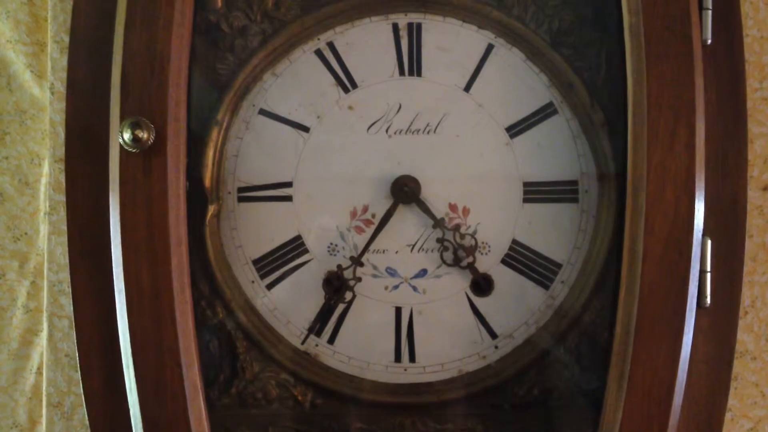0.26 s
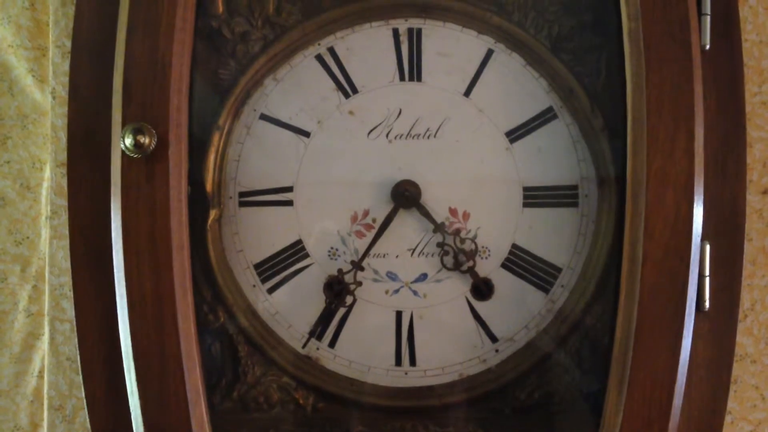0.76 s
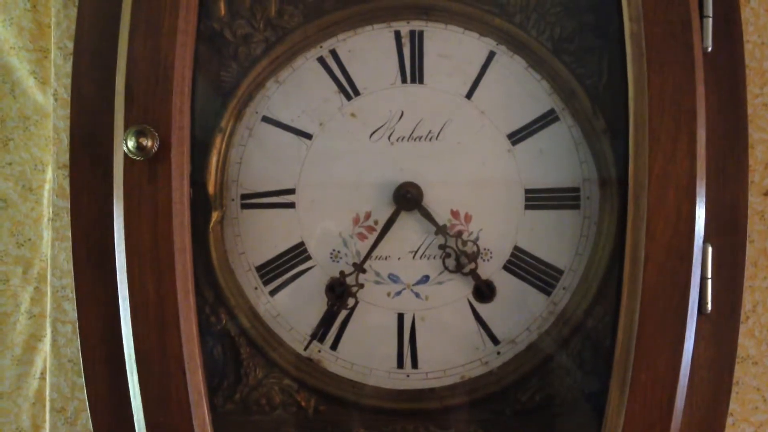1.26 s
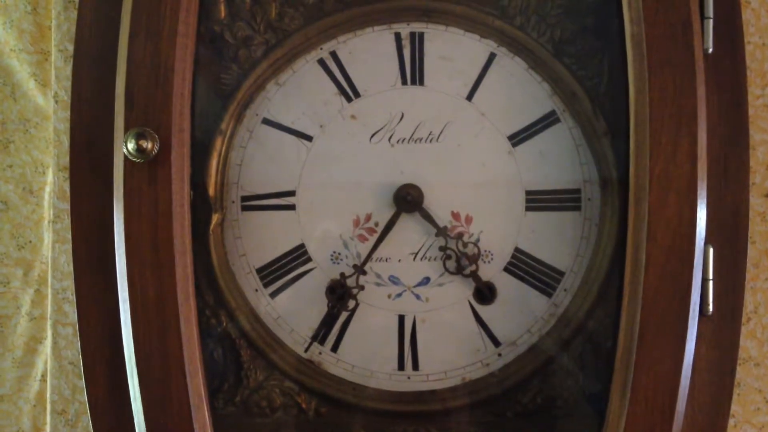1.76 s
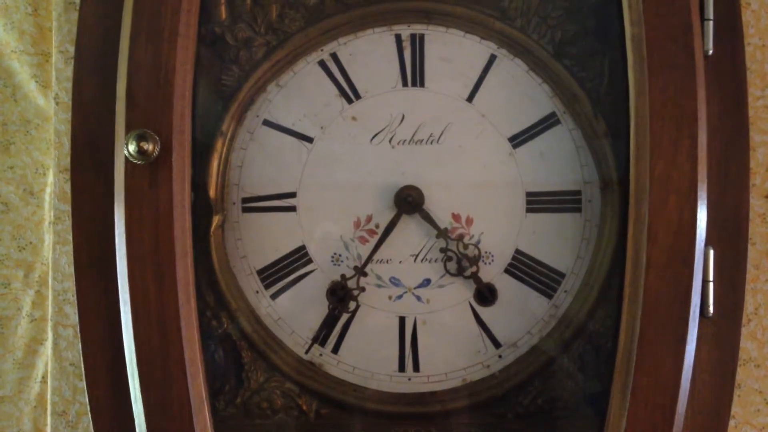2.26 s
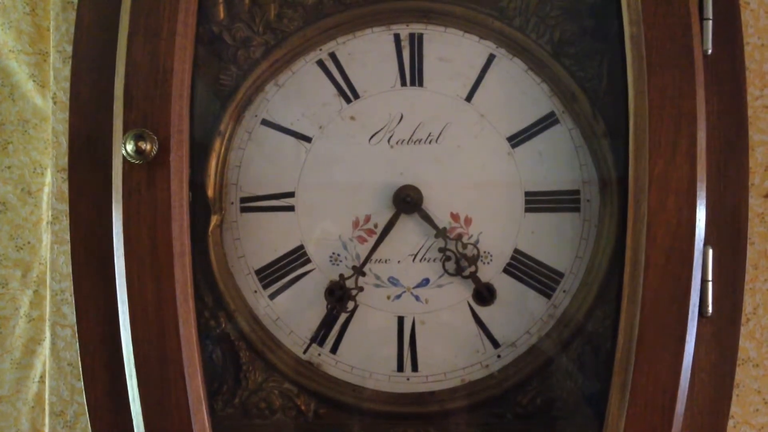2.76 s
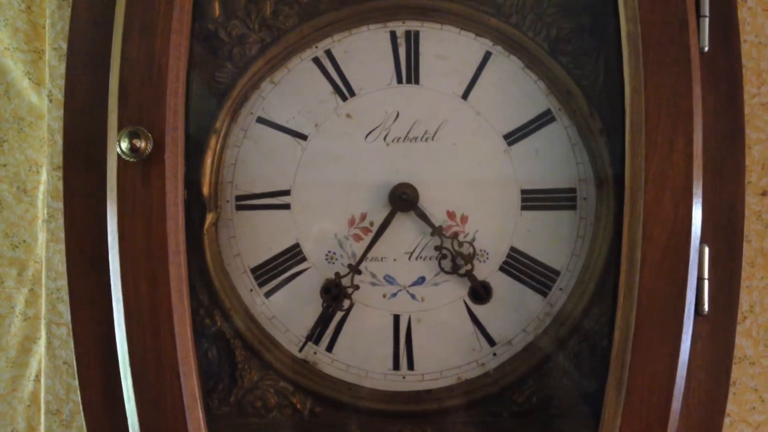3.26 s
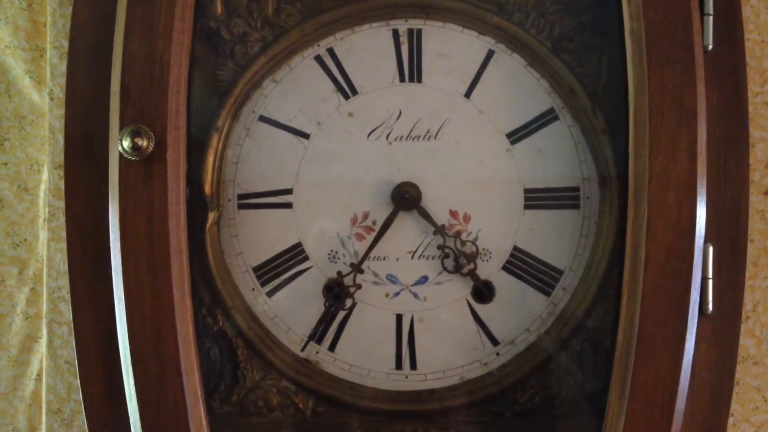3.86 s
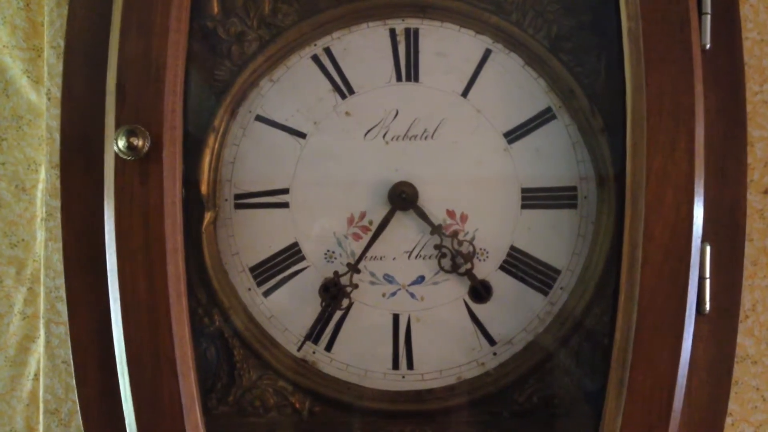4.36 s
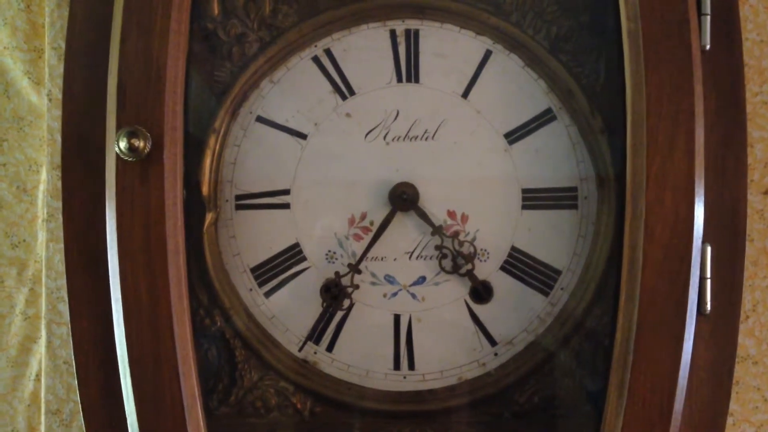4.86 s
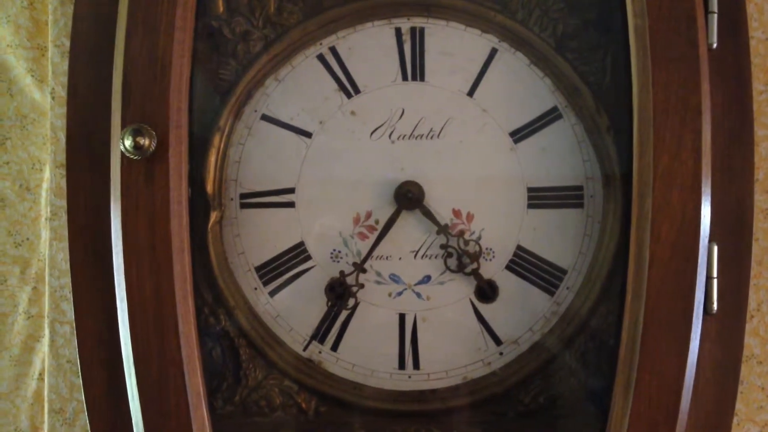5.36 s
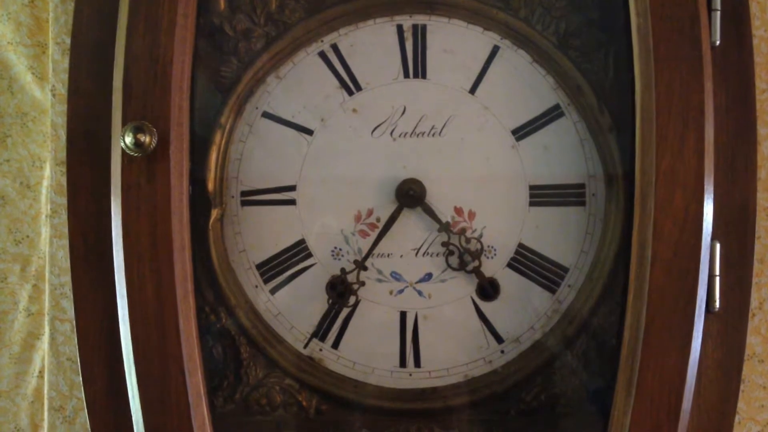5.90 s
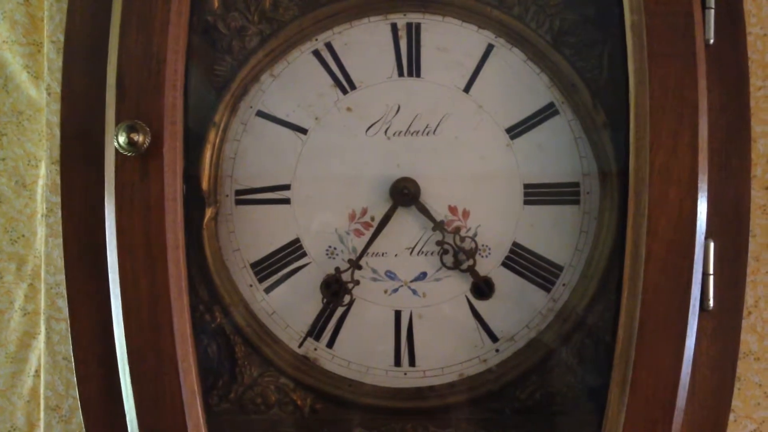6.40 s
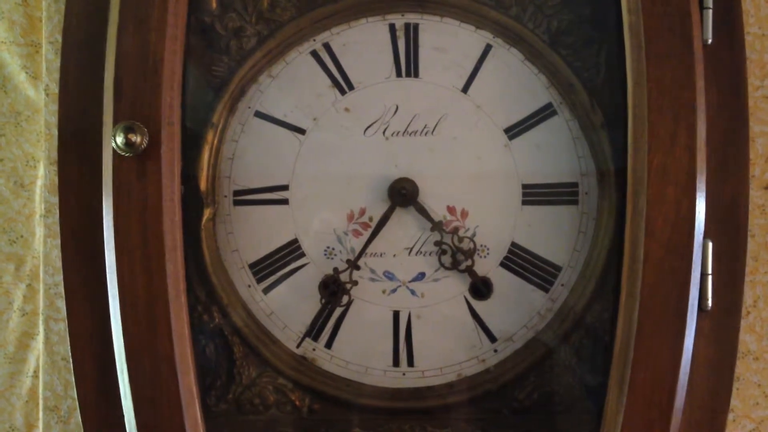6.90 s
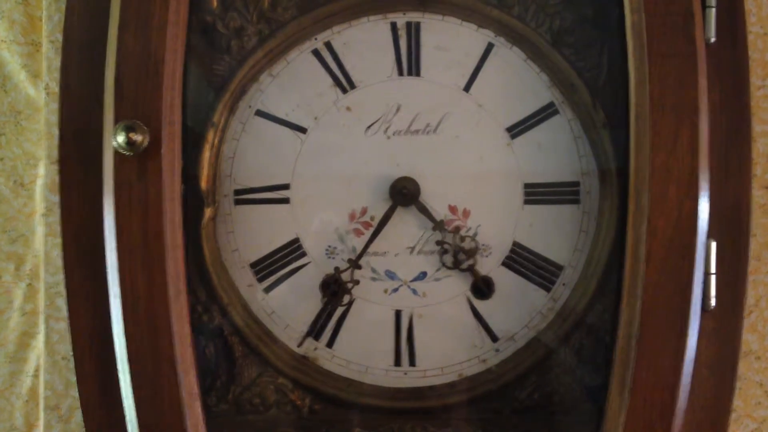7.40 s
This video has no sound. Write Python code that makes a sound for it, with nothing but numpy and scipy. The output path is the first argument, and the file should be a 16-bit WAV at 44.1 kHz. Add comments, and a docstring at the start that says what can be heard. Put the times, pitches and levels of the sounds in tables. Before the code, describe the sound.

Slow, steady ticking from an old tall clock, close to the microphone. Every beat clatters as several tiny metal contacts within a fraction of a second, crisp and gritty on top, hollow and wooden below, sometimes leaving a thin steely ring. Alternate beats change timbre. Between them the quiet room holds only faint muffled knocks, low rumble and light microphone hiss.

```python
"""Bright, rattling ticks, each with a wooden boom after it: a tall pendulum clock in a quiet room.
It is heard from close by, through its door. Each beat is a cluster of contacts in the escapement that sets
brass movement, wooden case and a thin rod ringing as decaying sines, with gritty noise for the dense modes.
Left and right swings strike different pallets. Faint thuds, a low rumble and microphone hiss lie below."""
import sys
import numpy as np
from scipy import signal
from scipy.fft import rfft, irfft, next_fast_len
from scipy.io import wavfile

SR = 44100
rng = np.random.default_rng(int(sys.argv[2]) if len(sys.argv) > 2 else 0)


def voltage_ratio(level):
    """Linear amplitude factor for a level in decibels (scalar or array-like)."""
    return 10 ** (np.asarray(level, float) / 20)


def materialize(psi):
    """Save the field psi as 16-bit PCM at rate SR to the path in sys.argv[1].

    A 1-D psi becomes a single channel; in a 2-D psi each row is a channel.
    """
    bounded = np.clip(np.atleast_2d(psi).T, -1, 1)
    quanta = np.round(bounded * 32767).astype(np.int16)
    wavfile.write(sys.argv[1], SR, quanta)


N = 336924   # samples

# upper limits: large boards, small panels, brass plates
PANEL_HZ, BRASS_HZ, PLATE_HZ = 760, 2800, 5500

# beats: landing_s, landing_db, rebound_s (time after landing), rebound_db, loss_db (per later bounce)
BEATS = [(0.336, -19, 0.014, -18.5, 10.5), (1.3737, -19, 0.013, -19, 7.5), (2.5023, -17, 0.016, -17.5, 13),
         (3.5106, -23.5, 0.02, -12, 30), (4.6119, -18.5, .0126, -17.5, 6.5), (5.6454, -22, 0.019, -14, 13),
         (6.7981, -18, .012, -19, 8)]
# shock into the case at each of the five contacts, clack of the small panels and push into the large boards:
# clack_left_db, clack_right_db, push_left_db, push_right_db
SHOCKS = [(-30.5, -36, -30.5, -41.5), (-32, -39, -29, -39), (-42.5, -51.5, -33.5, -37.5),
          (-47.5, -51.5, -44.5, -46), (-57.5, -77, -47, -44)]
# plucks of the thin rod: start_s, level_db
PLUCKS = [(0.336, -54), (0.377, -51), (1.4011, -49.5), (1.4283, -56.5), (2.5023, -47), (2.5442, -55),
          (3.532, -52), (4.6114, -46), (4.6555, -52), (5.6688, -48), (5.6898, -49), (6.8444, -43),
          (6.8693, -59)]
# stray light touches: start_s, blow_db
TOUCHES = [(0.4194, -45), (1.3684, -35), (1.4445, -53), (5.6515, -26), (6.8693, -40.5)]
TOUCH_CLACK_DB = -12   # clack of a touch, relative to its blow


def clock():
    """Beat by beat the contacts strike brass, wood and rod; the swing alternates left and right."""
    out = np.zeros(N + SR)
    size = int(.7 * SR)   # length of one beat's stretch
    for beat, row in enumerate(BEATS):
        side = beat % 2   # 0 left, 1 right
        times_s, blows_db = contacts(*row)
        start = round(times_s[0] * SR) - 400   # room for touches just before the landing
        clacks_db, pushes_db = np.array(SHOCKS)[:, side::2].T
        blows = impulses(np.c_[times_s, blows_db], start, size)
        clacks = impulses(np.c_[times_s, clacks_db], start, size)
        pushes = impulses(np.c_[times_s, pushes_db], start, size)
        touches = impulses(TOUCHES, start, size)
        plucks = impulses(PLUCKS, start, size)
        blows = blows + touches
        clacks = clacks + voltage_ratio(TOUCH_CLACK_DB) * touches

        brass = movement(blows, clacks, side, plate_db=17, chatter_db=-3, chatter_t60=0.069,
                         chatter_per_s=800., scatter_db=3.0, contact_s=0.0012)
        boards = case(clacks, pushes, side, lags_s=(.005, .0015), contact_hz=3480.0,
                      knock_db=-2.5, knock_t60=0.094, knocks_per_s=200.)
        dense = wash(blows, clacks, pushes, side, levels_db=(4.0, 1, 9.0, -6.5),
                     rises_hz=(41.0, 60., 400., 300.), grit=0.84)
        out[start:start + size] += voltage_ratio(-16.5) * brass + voltage_ratio(-8.5) * boards + dense + rod(plucks, side)
    return out[:N]


BOUNCE_S, BOUNCE_STRETCH = .0135, 1.2   # first gap after the rebound, growth of each next gap


def contacts(landing_s, landing_db, rebound_s, rebound_db, loss_db):
    """Times and blows of one beat: landing, rebound, then three bounces, each later and weaker."""
    later = np.arange(3)
    gaps_s = np.r_[0, rebound_s, BOUNCE_S * BOUNCE_STRETCH ** later]
    blows_db = np.r_[landing_db, rebound_db, rebound_db - loss_db * (later + 1)]
    return landing_s + np.cumsum(gaps_s), blows_db


# ringing modes of the brass movement, levels relative: pitch_hz, left_swing_db, right_swing_db, t60_s
MOVEMENT = [(3370, -19.5, -11, 0.054), (3586, -53, -11, 0.027), (4130, -23, -21.5, 0.081),
            (4295, -18.5, -29, 0.078), (4450, -16.5, -15.5, 0.053), (5370, -15, -7.5, 0.069),
            (6220, -10.5, -17, 0.057), (6852, 5, 4.5, 0.033), (7340, -4.5, -8.5, 0.061),
            (7450, -10, -22, 0.041), (8120, -8, -10, 0.071), (8272.0, -2, 0.5, 0.05),
            (8430, -2, -5.5, 0.057), (8650, -2.5, -3.5, 0.061), (8620, -8, -19, 0.044),
            (9190, -7, -9.5, 0.042), (9680, -11.5, -27.5, 0.038), (10623.0, -18, -16, 0.05),
            (11060, -9.5, -10.5, 0.084), (10860, -12, -20, 0.017), (11400, -17, -14, 0.056),
            (11760, -11.5, -20, 0.059), (12200, -18, -12.5, 0.05), (12800, -8, -26, 0.056),
            (13510, -5.5, -10, 0.059), (14026.0, -18.5, -19, 0.05), (14200, -12, -10, 0.05),
            (14948.0, -6, -27, 0.05), (15553.0, -13, -9, 0.05)]


def movement(blows, clacks, side, plate_db, chatter_db, chatter_t60, chatter_per_s, scatter_db, contact_s):
    """Blows build up over the contact time, loose chatter follows; each mode is caught with its own strength.
    The low modes belong to the plates, which shake with the clack of the case."""
    strikes = np.array([voltage_ratio(plate_db) * clacks, blows])
    marks = rng.random(len(blows)) < chatter_per_s / SR
    chatter = voltage_ratio(chatter_db) * dying(strikes, chatter_t60) * marks
    contact = np.hanning(round(np.clip(contact_s, .0002, .004) * SR) + 2)
    out = 0
    for mode in MOVEMENT:
        hz, level_db, t60 = mode[0], mode[1 + side], mode[3]
        part = int(hz > PLATE_HZ)
        caught = strikes[part] * voltage_ratio(scatter_db * rng.standard_normal(len(blows)))
        # the contact pulse carries the mode's own pitch at a random phase
        swing = np.cos(2 * np.pi * (hz * np.arange(len(contact)) / SR + rng.random()))
        hit = signal.lfilter(2 * contact * swing / contact.sum(), [1], caught)
        force = hit + chatter[part] * rng.standard_normal(len(blows))
        out = out + voltage_ratio(level_db) * ring(force, hz, t60)
    return out


# ringing modes of the wooden case, levels relative: pitch_hz, left_swing_db, right_swing_db, t60_s
CASE = [(87.5, -27.5, -22.5, 0.83), (137.1, -22.5, -20.5, 0.73), (220.8, -8.5, -6, 0.58),
        (256, -15, -1.5, 0.64), (292.2, -7.5, 2, 0.31), (314.5, -4.5, -6, 0.57), (346.4, 1, -9, 0.45),
        (364.6, -3.5, -25, 0.3), (460.7, 2, -5.5, 0.25), (543.7, -6.5, -3.5, 0.21), (712, -9.5, -19, 0.22),
        (818, -22.5, -13.5, 0.23), (925, -16, -36, 0.2), (977.0, -13, -17.5, 0.32), (1119, -15, -35, 0.21),
        (1366, -3, -6, 0.1), (1530, -16, -2.5, 0.1), (1865, -7.5, -13, 0.17), (1970, -11.5, -17.5, 0.27),
        (2255, -31, -18, 0.3), (2260, -13, -27, 0.25), (2589.0, -5, -15, 0.13)]


def case(clacks, pushes, side, lags_s, contact_hz, knock_db, knock_t60, knocks_per_s):
    """The shock reaches the wood late and rounded off.
    Clacks and their loose after-knocks ring the small panels, pushes the large boards."""
    marks = rng.random(len(clacks)) < knocks_per_s / SR
    knocks = voltage_ratio(knock_db) * dying(clacks, knock_t60) * marks * rng.standard_normal(len(clacks))
    late = np.roll([pushes, clacks + knocks], round(lags_s[side] * SR), axis=1)
    forces = soften(late, contact_hz)
    out = 0
    for k, mode in enumerate(CASE):
        hz, level_db, t60 = mode[0], mode[1 + side], mode[3]
        sign = (-1) ** k   # neighbouring modes start in opposite directions
        out = out + sign * voltage_ratio(level_db) * ring(forces[int(hz > PANEL_HZ)], hz, t60)
    return out


# relative level of the many dense modes between those, left and right swings: pitch_hz, level_db (per Hz)
WASH_LEFT = [(59, -53), (100, -21), (335, -6.5), (648, -9), (1390, -6.5), (1610, -19.5), (1950, -8),
             (2990, -25), (8460, -14), (10200, -16.5), (16000, -25)]
WASH_RIGHT = [(59, -52), (100, -25), (295, -10.5), (1080, -13), (1520, -12), (4870, -25), (6700, -20),
              (8640, -24), (10000, -45.5), (10700, -26), (16000, -21)]
# how long they ring: pitch_hz, t60_s
WASH_T60 = [(150, 0.67), (500, 0.22), (2000, 0.18), (5000, 0.14), (14000, 0.062)]


def wash(blows, clacks, pushes, side, levels_db, rises_hz, grit):
    """Dense modes heard as gritty noise dying band by band.
    Boards, panels, plates and the brass above them each have a level and a speed of swelling."""
    edges_hz = 110 * 2 ** np.arange(0, 7.4, .4)
    white = rng.standard_normal((2, len(blows)))
    white = white * np.exp(grit * rng.standard_normal((2, len(blows))))
    table = [WASH_LEFT, WASH_RIGHT][side]
    out = 0
    for k, (low, high) in enumerate(zip(edges_hz, edges_hz[1:])):
        hz = np.sqrt(low * high)
        part = int(hz > PANEL_HZ) + int(hz > BRASS_HZ) + int(hz > PLATE_HZ)
        shock = [pushes, clacks, clacks, blows][part]
        level = dying(soften(shock, rises_hz[part]), at_hz(WASH_T60, hz))
        band_pass = signal.butter(2, [low, high], "band", fs=SR, output="sos")
        band = signal.sosfilt(band_pass, white[k % 2])
        out = out + voltage_ratio(levels_db[part] + at_hz(table, hz)) * level * band
    return out


# ringing modes of the thin rod, levels relative to the pluck: pitch_hz, left_swing_db, right_swing_db, t60_s
ROD = [(2428, -7, 0, 0.17), (2585, -7.5, -29, 0.31), (5280, -7.5, -28, 0.22)]


def rod(plucks, side):
    """A thin steel part rings on cleanly after some contacts."""
    return sum(voltage_ratio(mode[1 + side]) * ring(plucks, mode[0], mode[3]) for mode in ROD)


# faint dull thuds: start_s, level_db (of the click before softening), pitch_hz
THUDS = [(0.04, -45, 114), (0.789, -50, 212), (1.548, -52, 121), (1.857, -53.5, 125), (2.717, -51, 130.5),
         (3.001, -53.5, 123), (3.956, -58, 132.5), (4.439, -61, 125), (5.22, -55, 129),
         (7.163, -53.5, 126.7)]


def thuds():
    """Soft low knocks: a softened click rings at its pitch, and more weakly above it."""
    out = np.zeros(N + SR)
    size = SR // 2
    for start_s, level_db, hz in THUDS:
        click = np.zeros(size)
        click[0] = voltage_ratio(level_db)
        force = soften(click, 260.0)
        at = round(start_s * SR)
        out[at:at + size] += ring(force, hz, 0.29) + voltage_ratio(-4) * ring(force, 1.7 * hz, 0.24)
    return out[:N]


# room rumble and hiss, shape only: pitch_hz, level_db (per Hz)
FLOOR = [(15, -69), (25, -48), (114, -4.5), (137, -3.5), (161, -14.5), (195, -2), (270, -5.5), (335, -3),
         (363, -12.5), (531, -8), (641, -12.5), (734, -13.5), (1040, -16.5), (14000, -26.5), (16000, -33)]
FLOOR_DB = -63   # rms level of the whole floor
# resonances of room and microphone port: pitch_hz, width_hz, lift_db
ROOM_MODES = [(125, 48, 2.7), (190, 34, 3.3), (302, 64, 5.2), (14100, 890, 2)]


def floor():
    """Steady noise shaped in frequency and lifted at the resonances of room and microphone port."""
    size = next_fast_len(N)
    hz = np.arange(1, size // 2 + 2) * SR / size
    lift_db = sum(db / (1 + (2 * (hz - centre) / width) ** 2) for centre, width, db in ROOM_MODES)
    spectrum = rfft(rng.standard_normal(size)) * voltage_ratio(at_hz(FLOOR, hz) + lift_db)
    noise = irfft(spectrum, size)[:N]
    return voltage_ratio(FLOOR_DB) * noise / noise.std()


def impulses(rows, start, size):
    """The rows (start_s, level_db, ..) that fall inside a stretch, as single clicks."""
    rows = np.array(rows)
    at = np.round(rows[:, 0] * SR).astype(int) - start
    inside = (at >= 0) & (at < size)
    out = np.zeros(size)
    out[at[inside]] = voltage_ratio(rows[inside, 1])
    return out


def ring(force, hz, t60):
    """A two-pole resonator: a unit click sets a sine ringing from height 1, falling 60 dB in t60."""
    r = voltage_ratio(-60 / (np.clip(t60, .002, 3) * SR))
    w = 2 * np.pi * hz / SR
    return signal.lfilter([0, np.sin(w)], [1, -2 * r * np.cos(w), r * r], force + 1e-18)


def dying(x, t60):
    """Every impulse leaves a level that falls 60 dB in t60."""
    return signal.lfilter([1], [1, -voltage_ratio(-60 / (np.clip(t60, .002, 3) * SR))], x + 1e-18)


def soften(x, hz):
    """A double one-pole low-pass of gain 1 at the bottom."""
    r = np.exp(-2 * np.pi * hz / SR)
    return signal.lfilter([(1 - r) ** 2], [1, -2 * r, r * r], x)


def at_hz(points, hz):
    """Reads a table on a log-frequency axis."""
    points = np.array(points)
    return np.interp(np.log(hz), np.log(points[:, 0]), points[:, 1])


def scene():
    """Clock and thuds carry no deep bass; the floor lies under them."""
    high_pass = signal.butter(4, 72., "high", fs=SR, output="sos")
    knocks = signal.sosfilt(high_pass, clock() + thuds())
    return (knocks + floor())[None]


def top_cut(x):
    """Nothing passes above the cut-off."""
    return signal.sosfilt(signal.butter(12, 16680, fs=SR, output="sos"), x)


def record(dry):
    """A steep low-pass cuts the top of the mono microphone signal."""
    low_pass = signal.cheby2(16, 45, 16300, fs=SR, output="sos")   # 45 dB down from 16300 Hz
    mix = signal.sosfilt(low_pass, dry)
    return top_cut(mix)


dry = scene()
out = record(dry)
materialize(out)
```